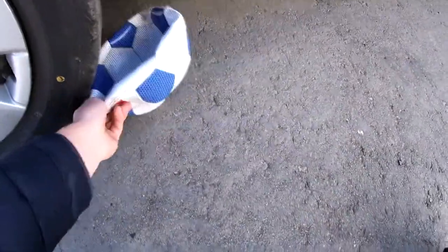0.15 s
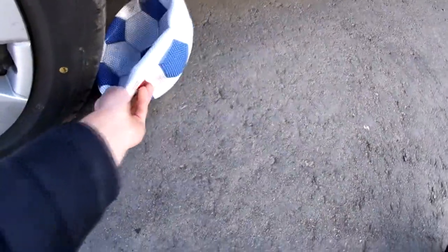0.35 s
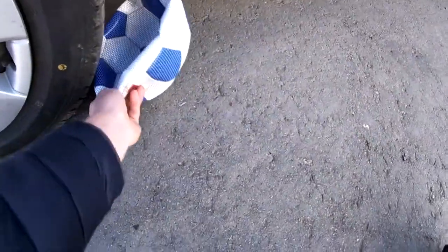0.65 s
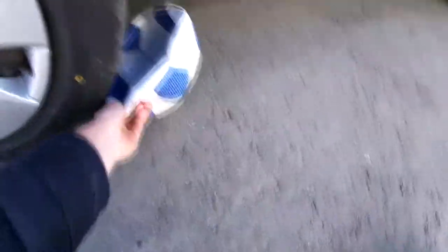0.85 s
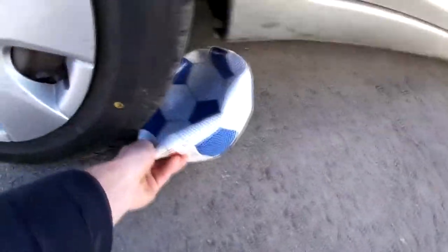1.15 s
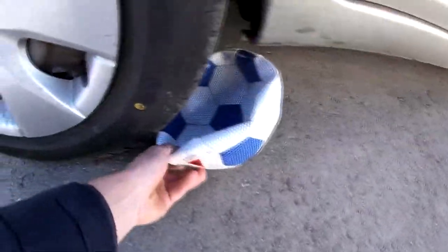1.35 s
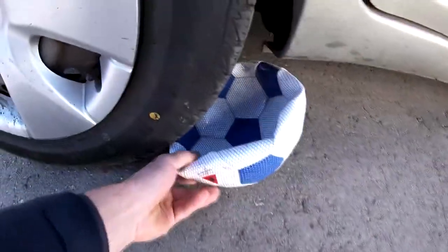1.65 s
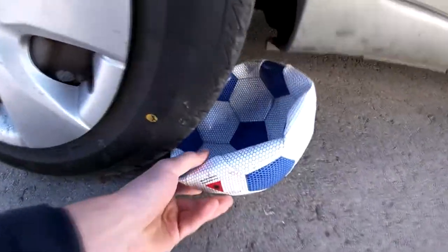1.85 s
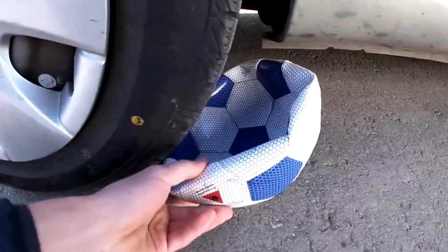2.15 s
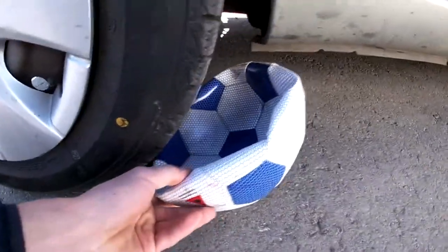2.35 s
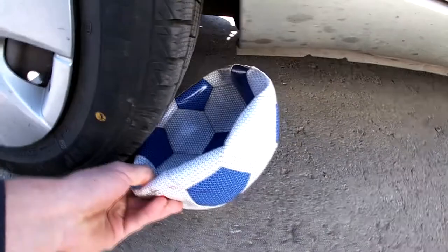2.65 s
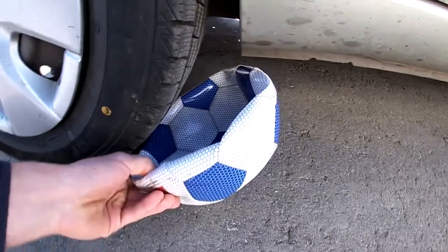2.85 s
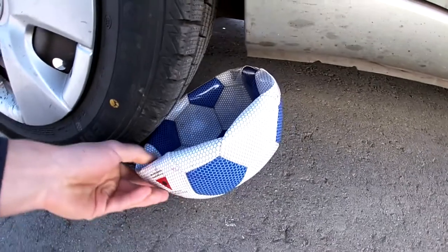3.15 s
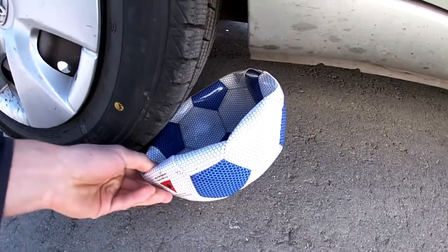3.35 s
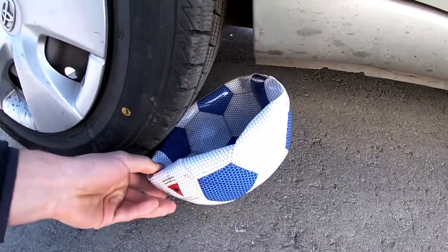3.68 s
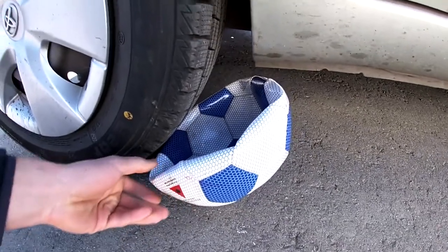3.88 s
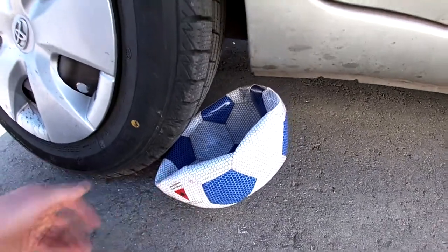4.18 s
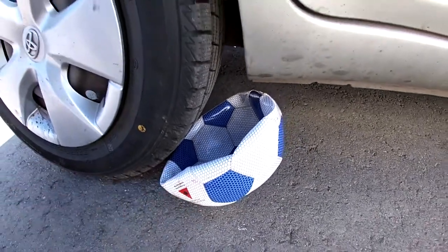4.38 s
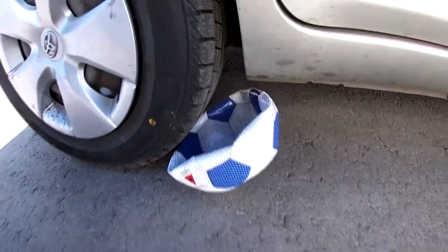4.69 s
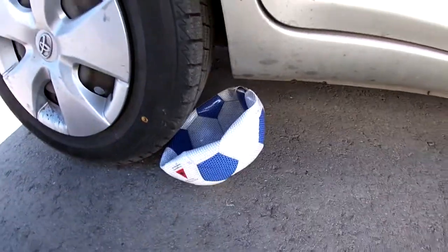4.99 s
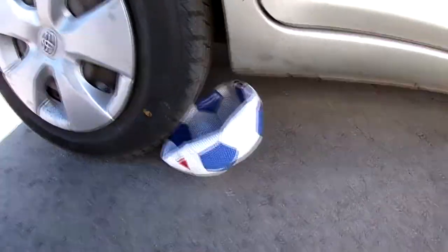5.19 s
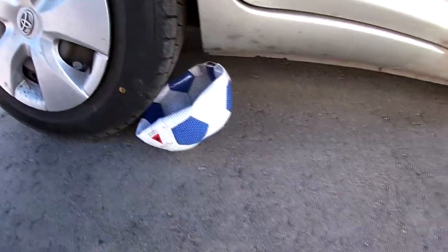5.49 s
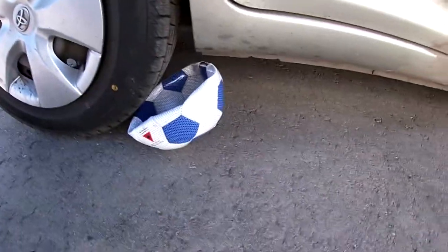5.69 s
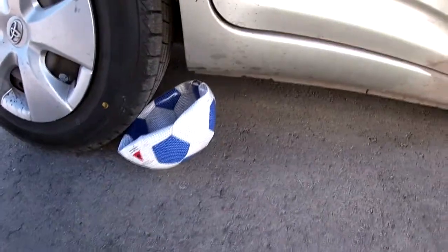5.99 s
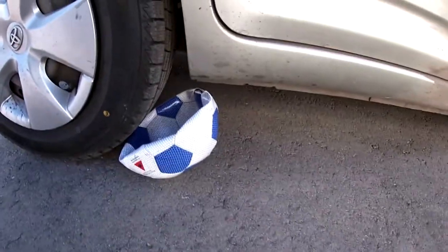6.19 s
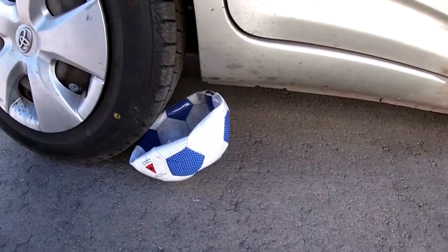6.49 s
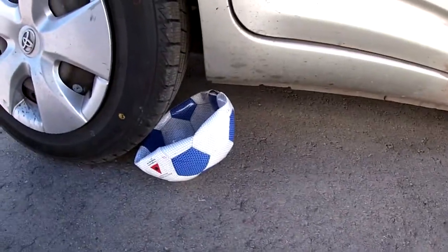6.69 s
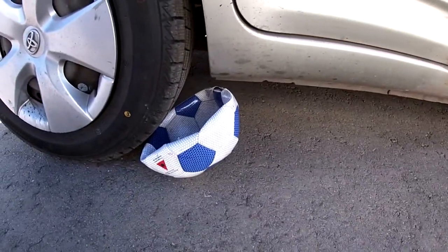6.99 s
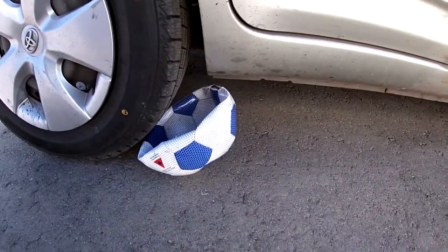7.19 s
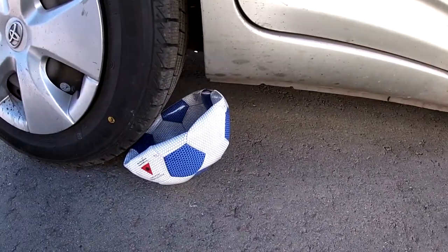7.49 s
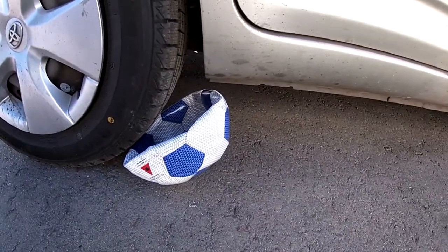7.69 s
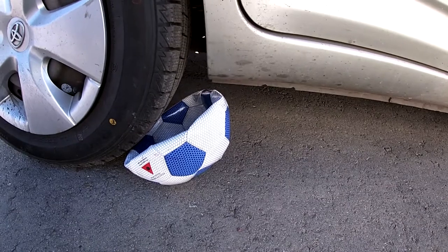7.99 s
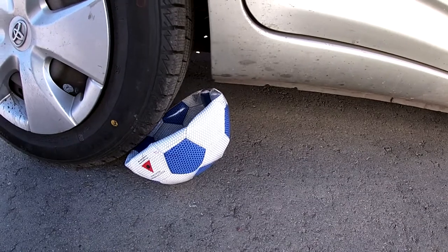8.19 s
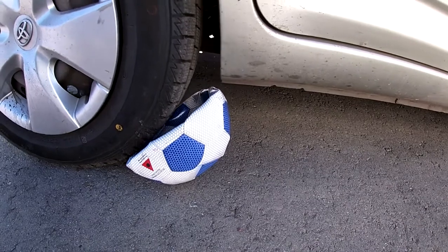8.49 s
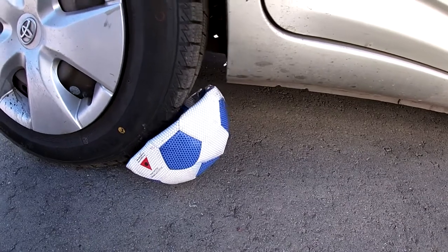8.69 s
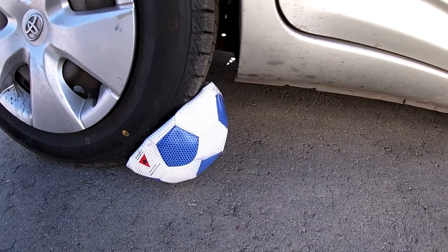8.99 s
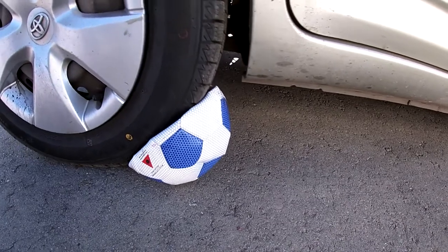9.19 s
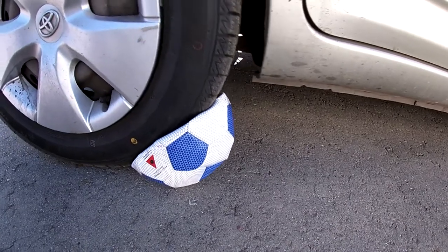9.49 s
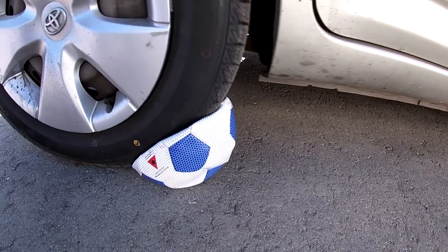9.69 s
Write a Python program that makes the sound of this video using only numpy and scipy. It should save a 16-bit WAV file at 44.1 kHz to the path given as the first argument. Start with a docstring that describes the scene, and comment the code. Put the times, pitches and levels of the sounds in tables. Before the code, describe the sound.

Outdoors on asphalt, a handheld microphone close to a car wheel picks up a steady idle: low throbbing exhaust, ticking valve gear, airy hiss and faint pump hum. A limp ball squeaks against the tyre early on, with light rustling. Soft wind buffets thump. An abrupt jump brings a slower, duller engine; the tyre rolls, thuds into the ball, squeaks, and crushes it over crackling grit.

```python
"""A four-cylinder car idles on asphalt: its exhaust sounds harmonics of the firing rate, its valve gear
strikes ringing modes, and filtered noise throbs with each firing. A belt whines, a pump hums and air buffets.
A limp ball wedged at the tyre squeaks by stick and slip; rustles and faint ticks are filtered snaps.
After an abrupt jump in time the car creeps: its loaded engine is slower and duller, its tyre booms and scuffs,
and the ball is crushed in bursts of noise as grit grinds, stones crack and skin scrapes in rough tones."""
import sys
import numpy as np
from scipy import signal
from scipy.fft import rfft, irfft, next_fast_len
from scipy.io import wavfile

SR = 44100
rng = np.random.default_rng(int(sys.argv[2]) if len(sys.argv) > 2 else 0)


def int16_out(signal):
    """Quantize to a 16-bit WAV file."""
    q = np.round(np.clip(np.atleast_2d(signal).T, -1, 1) * 32767)
    wavfile.write(sys.argv[1], SR, q.astype(np.int16))


N = 434385
JUMP_S = 7.335  # idling before, creeping after


def from_db(db):
    """Amplitude gain is ten to the power of a twentieth of the decibels."""
    return 10 ** (np.asarray(db) / 20)


def rms_one(x):
    """Normalisation: divide by the root mean square."""
    return x / np.sqrt(np.mean(x ** 2) + 1e-20)


def seconds():
    """Sampling: the time of every sample."""
    return np.arange(N) / SR


def in_time(rows):
    """Linear interpolation in time: one curve for each column after the first."""
    s, *columns = np.transpose(rows)
    return [np.interp(seconds(), s, column) for column in columns]


def white():
    """White noise: equal power at every frequency."""
    return rng.standard_normal(N)


def drift(rate):
    """Random modulation: straight lines join random knots of spread 1, at a rate in knots per second."""
    knots = rng.standard_normal(size=8000)
    return np.interp(seconds() * rate, np.arange(len(knots)), knots)


def coloured(x, spectrum):
    """Spectral filtering: shape a steady excitation by a table of frequency and level; rms 1."""
    size = next_fast_len(N)
    hz, db = np.transpose(spectrum)
    log_hz = np.log(np.maximum(np.fft.rfftfreq(size, 1 / SR), 1))
    gain = from_db(np.interp(log_hz, np.log(hz), db, left=-np.inf, right=-np.inf))
    return rms_one(irfft(rfft(x, size) * gain, size)[:N])


def band(x, low_hz, high_hz):
    """Band-pass filtering; rms 1."""
    sos = signal.butter(2, [low_hz, high_hz], "band", fs=SR, output="sos")
    return rms_one(signal.sosfilt(sos, x))


def ring(x, hz, width_hz):
    """Damped resonance: a unit click sets a decaying wave of height about 1 ringing."""
    radius = np.exp(-np.pi * width_hz / SR)
    angle = 2 * np.pi * hz / SR
    return signal.lfilter([.5, 0, -.5], [1, -2 * radius * np.cos(angle), radius ** 2], x + 1e-18)


def ringing(modes):
    """Forced resonance: noise keeps narrow modes sounding."""
    return sum(from_db(db) * rms_one(ring(white(), hz, width_hz)) for hz, width_hz, db in modes)


def grains(per_s, spread_db):
    """Shot noise: random snaps of uneven size."""
    snaps = (rng.random(N) < per_s / SR) * white()
    return snaps * from_db(spread_db * np.minimum(rng.exponential(1, N), 3))


def tone(hz, db):
    """Phase is the integral of frequency: a sine follows a pitch curve at an rms level."""
    return np.sqrt(2) * from_db(db) * np.sin(2 * np.pi * np.cumsum(hz) / SR)


def around(s, length_s):
    """Gaussian envelope: the samples near a short event, and a bell that falls to 1/e at length_s."""
    i = np.arange(max(0, int((s - 4 * length_s) * SR)), min(N, int((s + 4 * length_s) * SR)))
    return i, np.exp(-((i / SR - s) / length_s) ** 2)


def swell(s, length_s):
    """Gaussian envelope over the whole scene, silent away from its event."""
    out = np.zeros(N)
    i, bell = around(s, length_s)
    out[i] = bell
    return out


def held(rows, attack_s, release_s):
    """Exponential rise and decay: each row of start, end and level swells, holds and dies away."""
    t = seconds()
    out = np.zeros(N)
    for start, end, db in rows:
        before = np.minimum(t - start, 0) / attack_s
        after = np.maximum(t - end, 0) / release_s
        out += from_db(db) * np.exp(before - after)
    return out


def throb(firings, depth_db, uneven_db, flutter_db):
    """Amplitude modulation: a level swells once in each firing, more for every second one."""
    turn = 2 * np.pi * (firings - .73)
    return from_db(depth_db * np.cos(turn) + uneven_db * np.cos(turn / 2) + flutter_db * drift(70))


def underbody(x):
    """Comb filtering: dull echoes between asphalt, wheel and floor pan ripple the spectrum."""
    echo_db, count, direct = -19.5, 12, .36
    low = signal.sosfilt(signal.butter(1, 2500, fs=SR, output="sos"), x)
    dull = (1 - direct) * low + direct * x
    out = x.copy()
    for lag in (rng.uniform(.003, .024, count) * SR).astype(int):
        out[lag:] += from_db(echo_db) * rng.choice([-1, 1]) * dull[:-lag]
    return rms_one(out)


def knock(firings, place, hz, width_hz, db):
    """Impact excitation: once in four firings a snap and chatter ring a part, and its casing rings up."""
    chatter, chatter_s, snap = .026, .018, .75
    at = np.flatnonzero(np.diff(np.floor(firings / 4 - place))) + 1
    hits = np.zeros(N)
    hits[at] = from_db(1.0 * rng.standard_normal(len(at)))
    rattle = signal.lfilter([1], [1, -np.exp(-1 / (chatter_s * SR))], hits + 1e-18) * white()
    part = ring(snap * hits + chatter * rattle, hz, width_hz)
    casing_width_hz = 2 * width_hz
    return from_db(db) * 2 * np.pi * casing_width_hz / SR * ring(part, hz, casing_width_hz)


def whine(firings, multiple, db):
    """Frequency modulation: a belt-driven tone undulates as firings jerk the crank, and slips at random."""
    slip = .027 * drift(700) + .012 * drift(45)  # fast and slow shares of the pitch
    surge = .043 * np.cos(2 * np.pi * firings)
    speed = np.gradient(firings) * SR * (1 + surge + slip)
    return tone(multiple * speed, db + 3.0 * drift(90))


# exhaust orders: multiple of the firing rate, relative level_db
EXHAUST_ORDERS = [(1, 1), (2, -12), (5.004, -30.5), (6.998, -29.5)]
# drone at six times the firing rate: time_s, mean level_db
DRONE_LEVEL = [(0, -35), (1.3, -40.5), (2.5, -39), (3.6, -47), (4.5, -43), (7.3, -45)]


def exhaust(firings):
    """Harmonic series: low orders of the firing pulses and a wavering drone, fading off the tailpipe."""
    level_db, fade_db_per_s = -22.5, .27  # the microphone slowly leaves the tailpipe
    turn = 2 * np.pi * (firings + .107)
    orders = np.zeros(N)
    for k, db in EXHAUST_ORDERS:
        orders += from_db(db + .8 * min(k, 3) * drift(12)) * np.sin(k * turn)
    drone = from_db(in_time(DRONE_LEVEL)[0] + drift(8)) * np.sin(6 * turn)
    return -np.sqrt(2) * (from_db(level_db - fade_db_per_s * seconds()) * orders + drone)


# idle knocks: place in the four-stroke cycle (0-1), ring_hz, width_hz, relative level_db,
# growth_db_per_s as the microphone moves
IDLE_KNOCKS = [(.035, 1216, 70, -35.5, 0.94), (0.022, 667, 41.7, -37, 0.5), (0.079, 647, 42, -40.5, 0.5),
               (.08, 2520, 200, -49, 1), (.08, 2060, 110, -43.5, 2.5), (.27, 1180, 120, -43.5, 1.5),
               (.29, 666, 42, -42.5, 0.3), (.35, 660, 42, -50, 5.5), (.345, 1194, 140, -43.5, 1),
               (.36, 2560, 130, -54, 4.5), (0.53, 1220, 140, -44, 0), (.565, 940, 130, -42, -0.5),
               (.595, 1950, 130, -42.5, 1), (0.644, 2330, 160, -54, 5), (.65, 672, 50, -47, 2.5),
               (.85, 1210, 110, -52.5, 3.5), (0.832, 650, 50, -43, -0.5), (.919, 1910, 130, -36.5, -0.5)]


def valve_gear(firings):
    """Periodic impacts: parts knock in each cycle as the microphone nears some and leaves others."""
    from_middle_s = seconds() - JUMP_S / 2
    out = np.zeros(N)
    for place, hz, width_hz, db, growth in IDLE_KNOCKS:
        out += knock(firings, place, hz, width_hz, 1.5 + db + growth * from_middle_s)
    return out


# belt at idle as the microphone passes it: time_s, mean level_db
BELT_LEVEL_IDLE = [(0, -69), (1.2, -74), (1.6, -58.5), (2.3, -62), (2.9, -68), (3.6, -58), (4.3, -65),
                   (5, -75)]


def idle_belt(firings):
    """Gear-like multiplication: a faint whir at 103 times the firing rate."""
    return whine(firings, 103, in_time(BELT_LEVEL_IDLE)[0])


# engine hiss that gets past the wheel as the microphone moves: time_s, relative level_db
HISS_LEVEL = [(0, -56), (.8, -54), (2.3, -52.5), (3.5, -51), (4.7, -50), (5.9, -52), (7.3, -51.5)]


def openness_db():
    """Acoustic shadowing: the hiss level above its idling mean, as the wheel hides it less or more."""
    hiss_db = in_time(HISS_LEVEL)[0]
    return hiss_db - hiss_db[seconds() < JUMP_S].mean()


# engine noise at idle: frequency_hz, relative density_db per Hz
IDLE_SPECTRUM = [(200, -11), (300, -12.5), (500, -8), (720, -7.5), (880, -10.5), (1300, -11), (1900, -10.5),
                 (2800, -15.5), (5000, -15.5), (6300, -20.5), (7300, -25), (8500, -28.5), (11500, -34.5),
                 (14800, -41.5)]
# ringing engine parts at idle: frequency_hz, width_hz, level_db (rms) where the hiss is loudest, before throbbing
IDLE_MODES = [(668, 24, -56.5), (746, 24, -58), (1598, 80, -61), (3023, 98, -66), (3940, 130, -62.5),
              (4750, 120, -72), (6170, 110, -65), (2090, 70, -60), (8220, 34, -71), (8810, 28, -66.5),
              (10800, 160, -71)]


def engine_noise(firings):
    """Modulated noise: clatter, hiss, top and ringing parts throb; shadowing moves each band differently."""
    hiss_db, open_db = in_time(HISS_LEVEL)[0], openness_db()

    def noise(low_hz, high_hz):
        """Band-limited noise with the engine's spectrum."""
        return band(coloured(underbody(white()), IDLE_SPECTRUM), low_hz, high_hz)

    clatter = from_db(-46.5 + .1 * open_db) * noise(270, 2060)
    hiss = from_db(hiss_db + 3.5) * noise(2210, 7100)
    top = from_db(-53.5 + 1.43 * open_db) * noise(7180, 13700)
    parts = from_db(hiss_db - np.max(hiss_db)) * ringing(IDLE_MODES)
    # the wheel arch rings as the microphone passes it
    arch_level = from_db(-65) + from_db(-55) * swell(2.35, .52)
    arch = arch_level * rms_one(ring(white(), 2086, 100))
    low = clatter * throb(firings, depth_db=.5, uneven_db=.35, flutter_db=.5)
    high = (hiss + top + parts + arch) * throb(firings, depth_db=1.56, uneven_db=.5, flutter_db=1.08)
    return low + high


# engine speed at idle: time_s, firings_per_s
IDLE_SPEED = [(0.0, 24.908), (0.7, 24.727), (1.4, 24.56), (2.4, 24.168), (3.7, 24.229), (4.2, 23.886),
              (5.5, 23.996), (6.1, 23.882), (6.7, 24.073), (7.33, 24.072)]


def idling():
    """Superposition: one firing clock drives exhaust, valve gear, belt and engine noise."""
    firings = np.cumsum(in_time(IDLE_SPEED)[0]) / SR
    return exhaust(firings) + valve_gear(firings) + idle_belt(firings) + engine_noise(firings)


# pump hum when creeping: time_s, mean level_db
PUMP_CREEP_LEVEL = [(7.34, -46), (7.42, -42), (8.07, -50), (8.67, -50.5), (8.82, -54), (9.85, -47)]


def pump(later):
    """Tonal hum: an electric pump holds a slightly unsteady pitch, a little lower under way."""
    hz = np.where(later, 389.5, 394.3) + np.where(later, 4.0, 1.14) * drift(30)
    idle_db = -49.5 + .56 * openness_db()
    db = np.where(later, in_time(PUMP_CREEP_LEVEL)[0], idle_db)
    return tone(hz, db + 1.8 * drift(12))


# low rumble of engine and air: frequency_hz, relative density_db per Hz
RUMBLE_SPECTRUM = [(20, -26), (40, -1), (58, 2.5), (80, -2.5), (110, -6), (160, -8.5), (200, -16),
                   (280, -20.5), (450, -27.5)]
# rumble as the microphone moves: time_s, mean level_db
RUMBLE_CURVE = [(0, -32), (7.3, -33.5), (7.36, -37.5), (8.6, -33), (9.2, -36), (9.85, -36)]
# swells of the low boom: centre_s, length_s (to 1/e), mean pitch_hz, mean level_db at the peak
BOOM_SWELLS = [(.36, 0.36, 57.8, -30.5), (1.85, 0.41, 78, -39.5), (4.965, 0.17, 62, -28.5),
               (5.599, 0.21, 70.7, -34.5)]


def rumble(later):
    """Low-frequency noise with slow modulation; at idle a low boom wanders in it and swells."""
    lumps_db = .6 * drift(4) + 1.5 * drift(14)
    noise = from_db(in_time(RUMBLE_CURVE)[0] + lumps_db) * coloured(white(), RUMBLE_SPECTRUM)
    boom = tone(79.7 + 8 * drift(3), -46.5 + 2.8 * drift(20))
    for s, length_s, hz, db in BOOM_SWELLS:
        boom += swell(s, length_s) * tone(hz + 3 * drift(15), db + 2.6 * drift(16))
    return noise + np.where(later, 0, boom)


# ball squeaks on rubber, in pieces: an early squeak in two parts, its high overtone, a later squeak;
# each piece is a curve of time_s, mean pitch_hz, mean level_db
SQUEAK_CURVES = [
    [(.16, 1250, -56), (.187, 1030, -40), (.2, 1090, -49), (.218, 940, -42), (.229, 960, -37),
     (.236, 1040, -43), (.243, 1130, -38), (.256, 1330, -50)],
    [(.258, 1230, -52), (.277, 1060, -37.5), (.291, 1230, -51), (.305, 1500, -50), (.322, 1830, -54),
     (.338, 2250, -62), (.351, 2340, -47), (.368, 2450, -64)],
    [(.32, 4650, -60), (.328, 4600, -54), (.338, 4530, -56), (.356, 4850, -55), (.368, 4950, -64)],
    [(8.535, 1090, -55), (8.565, 1110, -45), (8.597, 1130, -40.5), (8.625, 1080, -45), (8.655, 1080, -58),
     (8.678, 1110, -46), (8.71, 1050, -60)],
]
# pitch roughness of each piece in turn: share of the pitch
SQUEAK_ROUGHNESS = [.035, .035, .03, .06]


def squeaks():
    """Stick-slip friction: rough gliding tones, each piece doubled an octave higher."""
    octave_db = -16
    out, t = np.zeros(N), seconds()
    jitter, shimmer_db = drift(500), 2.0 * drift(130)
    for curve, rough in zip(SQUEAK_CURVES, SQUEAK_ROUGHNESS):
        s, hz, db = np.transpose(curve)
        i = np.flatnonzero((t > s[0]) & (t < s[-1]))
        pitch_hz = np.interp(t[i], s, hz) * (1 + rough * jitter[i])
        level_db = np.interp(t[i], s, db) + shimmer_db[i]
        piece = tone(pitch_hz, level_db) + tone(2 * pitch_hz, level_db + octave_db)
        out[i] += signal.windows.tukey(len(i), .1) * piece
    return out


# sleeve and ball rustle, a short tick, and two faint ticks of grit:
# centre_s, length_s (to 1/e), level_db at the peak, centre_hz
RUSTLES_AND_TICKS = [(0.21, 0.04, -41.5, 1490), (0.212, .04, -53, 7040), (0.345, 0.068, -53, 7000),
                     (0.417, 0.0021, -33.5, 1110), (.805, 0.0063, -45, 8400), (1.144, 0.25, -45.5, 2650),
                     (1.17, 0.26, -51.5, 6440), (3.127, 0.17, -47.5, 8100), (8.797, 0.0083, -60, 6460),
                     (8.912, 0.0082, -62, 6000)]


def rustles_and_ticks():
    """Filtered shot noise: dense snaps in passing bands, long for a rustle and brief for a tick."""
    out = np.zeros(N)
    crackle = grains(5000, spread_db=-1.5)
    for s, length_s, db, centre_hz in RUSTLES_AND_TICKS:
        out += from_db(db) * swell(s, length_s) * band(crackle, centre_hz / 2.0, centre_hz * 1.19)
    return out


# dull buffets on the microphone and bumps of the tyre: centre_s, tone level_db at the peak, mean pitch_hz
BUFFET_EVENTS = [(2.637, -30, 130), (2.703, -29, 159), (2.733, -28, 220), (2.756, -24, 131),
                 (2.853, -22, 60), (2.919, -26, 75), (2.926, -26.5, 185), (2.984, -32, 145),
                 (3.011, -22.5, 63), (3.51, -22.5, 60), (5.39, -24, 57), (5.637, -31, 58.3),
                 (5.853, -22, 57.7), (5.867, -27, 148), (5.91, -21, 109), (6.24, -20, 88),
                 (6.411, -23.5, 65), (7.299, -27, 56), (7.56, -28, 54.3), (8.475, -28, 160),
                 (8.508, -23, 160), (8.542, -21.5, 151), (9.081, -31.5, 169)]
# flutter around them: frequency_hz, relative density_db per Hz
FLUTTER_SPECTRUM = [(30, 13), (70, 4), (150, -6.5), (240, -15), (330, -32), (500, -35)]


def bumps():
    """Short wave packets: buffets of a few cycles and one sharp thud, each wrapped in rough flutter."""
    flutter_db, flutter_stretch = -5.5, 1.66  # against each packet's level and length
    out = np.zeros(N)
    flutter, wobble = coloured(white(), FLUTTER_SPECTRUM), np.exp(.15 * drift(150))
    # a buffet falls to 1/e about one cycle either side of its peak
    events = [(s, db, hz, 1.036 / hz) for s, db, hz in BUFFET_EVENTS]
    events.append((8.402, -18, 134, .0015))  # the tyre meets the ball
    for s, db, hz, length_s in events:
        i, bell = around(s, length_s)
        out[i] += bell * tone(hz * wobble[i], db)
        out += swell(s, flutter_stretch * length_s) * from_db(db + flutter_db) * flutter
    return out


# creeping engine noise: frequency_hz, relative density_db per Hz
CREEP_SPECTRUM = [(200, 2.5), (310, -21.5), (500, -9), (720, -13.5), (900, -11), (1300, -16.5), (1600, -14),
                  (2200, -17), (3000, -18), (4100, -19.5), (5000, -24.5), (6000, -23.5), (8000, -39.5),
                  (11000, -60), (12500, -57), (14800, -66)]
# ringing engine parts when creeping: frequency_hz, width_hz, relative level_db
CREEP_MODES = [(676, 39, -58), (802, 63, -54), (1160, 130, -58), (1395, 53, -55), (1860, 130, -56.5),
               (2480, 200, -60), (2926, 140, -54.5), (3560, 300, -61), (4113, 70, -62), (6562, 90, -69)]
# high metallic ring at the wheel: time_s, level_db before throbbing
WHEEL_RING_LEVEL = [(7.34, -62), (8.6, -63.5), (9.2, -59), (9.6, -58), (9.85, -62)]


def loaded_engine(firings):
    """Modulated noise and resonance: dull noise throbs and each mode pulses every second firing."""
    engine = from_db(-44.5) * coloured(underbody(white()), CREEP_SPECTRUM)
    for mode in CREEP_MODES:
        pulsing_db = 4.0 * np.cos(np.pi * firings + 2 * np.pi * rng.random())
        engine += ringing([mode]) * from_db(pulsing_db)
    engine += from_db(in_time(WHEEL_RING_LEVEL)[0]) * rms_one(ring(white(), 5650, 140))
    return engine * throb(firings + .56, depth_db=1.0, uneven_db=0.0, flutter_db=.96)


# creeping knocks: place in the cycle (0-1), ring_hz, width_hz, relative level_db
KNOCKS_UNDER_LOAD = [(.01, 670, 70, -38), (.01, 1440, 80, -41), (.02, 3180, 250, -46),
                     (.02, 5160, 160, -50), (.39, 698, 70, -31), (.4, 1204, 90, -30.5),
                     (.5, 3200, 300, -41), (.63, 1110, 70, -45), (.63, 2940, 90, -41.5)]


def loaded_knocks(firings):
    """Periodic impacts: engine parts knock once in each slow cycle."""
    return sum(knock(firings, place, hz, width_hz, db - 1.0)
               for place, hz, width_hz, db in KNOCKS_UNDER_LOAD)


# belt when creeping: multiple of the firing rate, mean level_db
BELT_WHINES = [(79, -57), (106, -52.5)]
# thin high whistle: time_s, mean pitch_hz, mean level_db
WHISTLE_CURVE = [(7.36, 8725, -79), (8.05, 8712, -82), (8.47, 8726, -74.5), (8.93, 8764, -77),
                 (9.71, 8769, -77), (9.85, 8800, -81)]


def whine_and_whistle(firings):
    """Frequency-modulated tones: the belt whines with engine speed; a thin whistle flickers above."""
    belt = sum(whine(firings, multiple, db) for multiple, db in BELT_WHINES)
    hz, db = in_time(WHISTLE_CURVE)
    return belt + tone(hz + 20 * drift(120), db + 3.0 * drift(25))


def creeping_exhaust(firings):
    """Second harmonic of the firing rate, its level wavering slowly at random."""
    return from_db(-38 + 4 * drift(5.5)) * np.sin(4 * np.pi * firings)


# tread on asphalt: frequency_hz, relative density_db per Hz
TREAD_SPECTRUM = [(230, -24), (290, -0.5), (360, -2.5), (480, -0.5), (580, -2), (690, 2), (800, -6),
                  (950, -14)]
# tread rolling: start_s, end_s, mean level_db
TREAD_ROLLS = [(7.33, 7.88, -45), (7.95, 8.3, -52.5), (8.36, 8.53, -44.5), (9.47, 9.82, -42.5)]
# tyre flexing: centre_s, length_s (to 1/e), level_db at the peak
TYRE_FLEXES = [(7.452, 0.092, -31.5), (8.078, 0.11, -43), (8.542, 0.032, -24.5), (9.595, 0.07, -30),
               (9.83, 0.073, -32.5)]


def tyre():
    """Band-limited noise: the tyre booms as it flexes and its tread scuffs as it rolls."""
    flexing = from_db(-44.5) + sum(from_db(db) * swell(s, length_s) for s, length_s, db in TYRE_FLEXES)
    scuff = held(TREAD_ROLLS, .15, .032) * from_db(.58 * drift(45)) * coloured(white(), TREAD_SPECTRUM)
    return flexing * band(white(), 122, 185) + scuff


# engine speed when creeping under load: time_s, firings_per_s
CREEP_SPEED = [(7.335, 18.3), (7.7, 18.2), (8.1, 17.7), (8.5, 17.6), (9.0, 17.8)]


def creeping():
    """Superposition: a slow firing clock drives the loaded engine, joined by the rolling tyre."""
    firings = np.cumsum(in_time(CREEP_SPEED)[0] * (seconds() > JUMP_S)) / SR
    engine = loaded_engine(firings) + loaded_knocks(firings)
    return engine + whine_and_whistle(firings) + creeping_exhaust(firings) + tyre()


# grit: frequency_hz, relative density_db per Hz
GRIT_SPECTRUM = [(700, 11.5), (1500, 2), (3000, 8), (4200, 3.5), (6000, -23), (8000, -19), (10000, -27),
                 (12000, -50), (15000, -37)]
# a cracking stone: frequency_hz, relative density_db per Hz
CRACK_SPECTRUM = [(1500, -15), (3200, 7.5), (6000, 1), (9500, -10), (11000, -32), (15000, -40)]
# grinding under the ball: start_s, end_s, mean level_db of the grit
GRIND_SPANS = [(9.02, 9.7, -46.5), (9.235, 9.255, -57), (9.282, 9.316, -46), (9.347, 9.377, -48),
               (9.41, 9.47, -57), (9.73, 9.83, -62)]


def grinding():
    """Granular friction: dense grit scrapes and sparser small stones crack under the ball."""
    grit = from_db(2.2 * drift(130)) * coloured(grains(3500, spread_db=6.5), GRIT_SPECTRUM)
    cracks = from_db(-11) * coloured(grains(290, spread_db=-3), CRACK_SPECTRUM)
    return held(GRIND_SPANS, .012, .014) * (grit + cracks)


# skin scrapes: start_s, end_s, first pitch_hz, last pitch_hz, mean level_db
SKIN_SCRAPES = [(9.081, 9.107, 1174, 920, -43), (9.105, 9.223, 476, 440, -42),
                (9.426, 9.48, 635, 674, -44.5), (9.684, 9.772, 397, 354, -40.5)]


def scrapes():
    """Stick-slip friction: the ball's skin judders over the asphalt in short, rough, low tones."""
    out, t = np.zeros(N), seconds()
    jitter, flicker_db = 1 + .17 * drift(260), 3.5 * drift(110)
    for start, end, from_hz, to_hz, db in SKIN_SCRAPES:
        i = np.flatnonzero((t > start) & (t < end))
        pitch_hz = np.linspace(from_hz, to_hz, len(i)) * jitter[i]
        out[i] += signal.windows.tukey(len(i), .3) * tone(pitch_hz, db + flicker_db[i])
    return out


# crumpling skin: frequency_hz, relative density_db per Hz
CRUMPLE_SPECTRUM = [(120, -20), (250, 9), (480, 8.5), (620, -13), (950, -1), (1400, -1.5), (2500, -12),
                    (6000, -43)]
# folds of the skin: start_s, end_s, mean level_db
SKIN_FOLDS = [(9.1, 9.28, -42), (9.43, 9.8, -42.5)]


def crumpling():
    """Shot noise in fits: the ball's skin buckles in many small snaps."""
    crumple = from_db(2.0 * drift(50)) * coloured(grains(4000, spread_db=3.0), CRUMPLE_SPECTRUM)
    return held(SKIN_FOLDS, .016, .029) * crumple


# larger stones: centre_s, relative level_db
STONE_CRACKS = [(9.242, -52), (9.279, -49), (9.288, -48), (9.302, -43), (9.314, -41), (9.32, -44),
                (9.346, -44), (9.362, -43), (9.368, -45), (9.38, -52), (9.402, -49), (9.412, -47),
                (9.426, -47), (9.444, -46), (9.464, -50), (9.473, -47), (9.501, -50), (9.517, -46),
                (9.537, -49), (9.569, -47), (9.586, -48), (9.616, -49), (9.635, -47), (9.657, -52),
                (9.683, -50), (9.707, -44), (9.795, -53), (9.822, -51)]


def stones():
    """Brittle fracture: larger stones crack as millisecond bursts of filtered noise."""
    bursts = sum(from_db(db + 3.5) * swell(s, .0012) for s, db in STONE_CRACKS)
    return bursts * coloured(white(), CRACK_SPECTRUM)


def crush():
    """Superposition of friction, buckling and fracture as the tyre crushes the ball."""
    return grinding() + scrapes() + crumpling() + stones()


def scene():
    """Equal-power crossfade: the idling car, then almost at once the rolling car."""
    later = seconds() >= JUMP_S
    fade = np.clip((seconds() - JUMP_S) / .012 + .5, 0, 1)
    rolling = np.sin(np.pi / 2 * fade) * (creeping() + crush())
    idle = np.cos(np.pi / 2 * fade) * idling()
    return (rolling + idle + pump(later) + rumble(later) + squeaks() + rustles_and_ticks() + bumps())[None]


def record(dry):
    """Low-pass filtering: the microphone loses the highest treble and the top is cut steeply."""
    soft = signal.sosfilt(signal.butter(4, 13500, fs=SR, output="sos"), dry)
    return signal.sosfilt(signal.ellip(10, .1, 80, 15000, fs=SR, output="sos"), soft)


dry = scene()
out = record(dry)
int16_out(out)
```